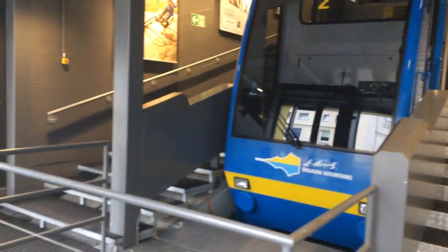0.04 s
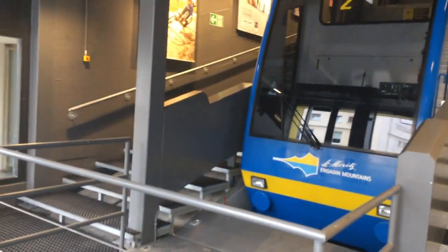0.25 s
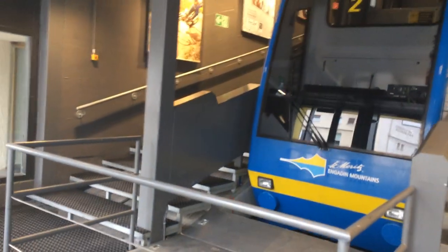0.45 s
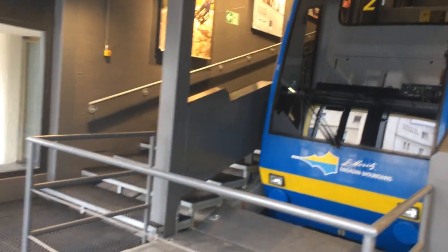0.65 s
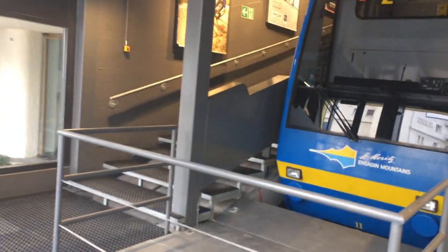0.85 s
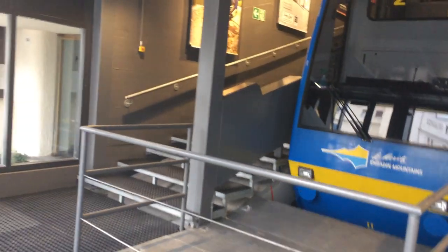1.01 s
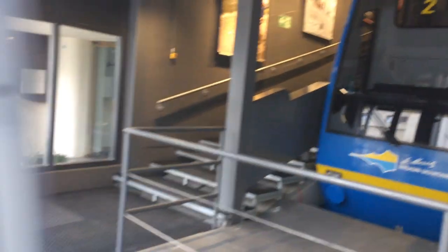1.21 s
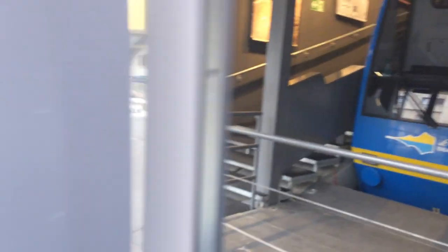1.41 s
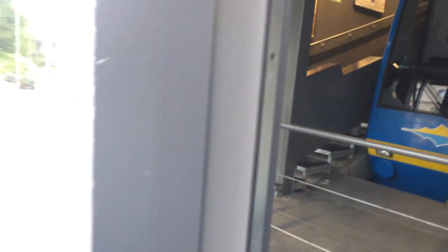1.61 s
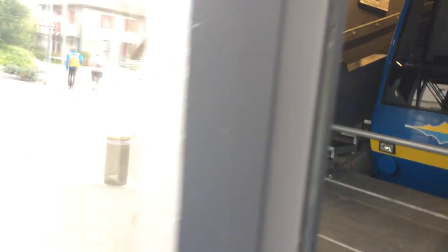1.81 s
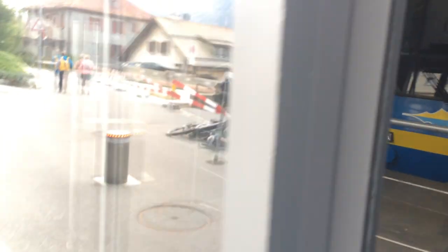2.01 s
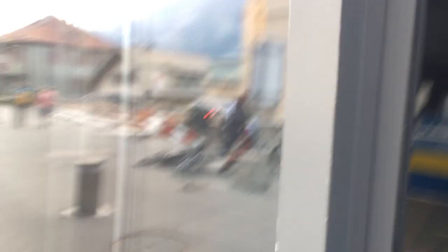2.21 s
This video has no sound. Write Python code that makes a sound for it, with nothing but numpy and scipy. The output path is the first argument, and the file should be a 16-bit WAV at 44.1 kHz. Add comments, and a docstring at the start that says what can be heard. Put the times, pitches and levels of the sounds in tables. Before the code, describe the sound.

A steel door latch snaps at about 0.2 seconds, bright and hard, ringing briefly in a station hall. At about 1.15 seconds the door shuts with a duller clunk, a quick rattle and a short echo. From 1.4 seconds a draught buffets the microphone with low thumps, strongest between 1.7 and 2.1 seconds. A quiet rumble and airy hiss run throughout, with a few faint distant knocks.

```python
"""Latch and door in a funicular station.

Two clacks echo in the hall: a bright steel latch snaps, then a door shuts with a duller clunk.
Each is a few cracking contacts, ringing modes and a diffuse tail. Near the open doorway a draught
buffets the microphone. Behind: faint far knocks, hand rustle and a quiet hall rumble."""
import sys
import numpy as np
from scipy import signal
from scipy.fft import rfft, irfft
from scipy.io import wavfile

SR = 44100
rng = np.random.default_rng(int(sys.argv[2]) if len(sys.argv) > 2 else 0)


def file_out(sig):
    """Save sig as 16-bit WAV at sys.argv[1]."""
    # one column per channel
    cols = np.atleast_2d(sig).T
    # limit, then scale
    lim = np.clip(cols, -1, 1)
    pcm = np.round(lim * 32767).astype(np.int16)
    wavfile.write(sys.argv[1], SR, pcm)


N = 103635
TIME = np.arange(N) / SR

# latch, door contacts: start_s, relative_db
LATCH_CONTACTS = [(0.2162, -2.5), (0.2178, -3), (0.2205, -3.5)]
DOOR_CONTACTS = [(1.149, -13), (1.1528, 1), (1.1548, 3), (1.163, -2), (1.179, -1), (1.208, -13)]
# resonances: pitch_hz, relative_db, t60_s
LATCH_MODES = [(939, -12, .6), (1709, -6, .4), (1908, -4, .35), (1966, -3, .45), (2022, -5, .45),
               (2200, -7, .5), (2457, 1, .35), (2850, -10, .55), (3230, -10, .35), (3395, -8, .35),
               (3668, -7, .3), (3951, -7, .3), (4198, 0, .25), (4275, 0, .25), (5353, -7, .36),
               (5550, -9, .6), (5927, -7, .35), (7052, -6, .3), (7410, -5, .3), (8524, -4, .3)]
DOOR_MODES = [(250, -7, .36), (309, -6, .28), (388, 2, .36), (500, -5, .27), (641, -5, .38), (675, -9, .36),
              (872, -9, .27), (1022, -11, .27), (1711, -1, .24), (1775, -8, .22), (2465, -10, .2),
              (2540, -7, .2), (2691, -8, .24), (3270, -10, .17), (5122, -15, .27), (5192, -18, .27)]
# contact spectra: freq_hz, density_db
LATCH_CRACK_COLOUR = [(500, -27), (1300, -15), (1900, 2.5), (2500, -4.5), (3100, -5.5), (4200, 1.5),
                      (6000, -2), (8000, -7.5), (15000, -8)]
DOOR_CRACK_COLOUR = [(150, -11), (350, 6.5), (700, -19), (1200, -5), (1750, 1.5), (2500, -5.5), (3500, -11),
                     (5300, -11.5), (6200, -25), (11000, -25), (15000, -46)]
# echo spectra: freq_hz, density_db
LATCH_ECHO_COLOUR = [(300, 0), (600, -13), (920, -8.5), (1400, -13.5), (1700, -4), (2400, -2), (2650, -3.5),
                     (4300, -5.5), (4800, -3), (5600, -2), (6600, -6), (7800, -6.5), (9200, -3),
                     (12000, -7), (15500, -13.5)]
DOOR_ECHO_COLOUR = [(120, -10), (170, -10), (230, -0.5), (390, -3.5), (540, -8.5), (650, -10),
                    (1270, -16.5), (1760, -16), (2200, -16), (2600, -21.5), (3600, -25), (5200, -20.5),
                    (5750, -29.5), (11500, -34), (15500, -54)]
# echo decay: freq_hz, t60_s
LATCH_ECHO_T60 = [(400, 0.47), (2000, 0.76), (5000, 0.72), (8000, 0.48), (14000, 0.3)]
DOOR_ECHO_T60 = [(250, 0.35), (1000, 0.47), (2200, 0.36), (5000, 0.52), (12000, 0.25)]

# eddies on the microphone: peak_s, push_db, centre_hz, edge_db
EDDIES = [(0.04, -42, 83, -75), (0.385, -47, 111, -74), (0.699, -44.5, 113, -68), (1.398, -23, 81.6, -59),
          (1.475, -37.5, 144, -52), (1.520, -26.5, 89, -60), (1.635, -25.5, 182, -28),
          (1.642, -23.5, 159, -38), (1.709, -19.5, 97, -34.5), (1.718, -47, 151, -23.5),
          (1.742, -25, 116, -26.5), (1.767, -26, 162, -32), (1.793, -27.5, 180, -54), (1.844, -21, 99, -40),
          (1.882, -24.5, 124, -29.5), (1.906, -35, 150, -30), (1.9282, -21, 159, -22),
          (1.957, -22.5, 123, -38), (2.058, -17.5, 80.6, -39), (2.141, -31.5, 134, -45)]
# draught strength: time_s, level_db
DRAUGHT_LEVEL = [(1.3, -63), (1.42, -46.5), (1.54, -46), (1.6, -50), (1.68, -47), (1.745, -31.5),
                 (1.80, -32.5), (1.87, -40.5), (1.95, -37), (1.99, -42.5), (2.08, -39.5), (2.18, -49),
                 (2.3, -52), (2.35, -46)]
# turbulence spectra: freq_hz, density_db
DRAUGHT_COLOUR = [(20, -27), (45, -6.5), (85, -7), (190, -14), (280, -27), (600, -63), (1500, -73)]
FLUTTER_COLOUR = [(100, -17), (280, -5.5), (500, -7.5), (700, -25), (1000, -25.5), (2000, -73)]

# far knocks: start_s, clatter_db, thud_db
KNOCKS = [(0.031, -61.5, -50), (0.673, -52.5, -64), (0.918, -56.5, -54.5), (1.403, -70, -66)]
# knock spectra: freq_hz, density_db
CLATTER_COLOUR = [(100, -7), (400, 2), (1200, 2.5), (2200, 3.5), (4000, -12), (12000, -28)]
THUD_COLOUR = [(150, -8), (290, -4), (380, -2), (480, -13), (800, -27), (3000, -54)]
# hand rustles: peak_s, level_db, half_length_s
RUSTLES = [(1.72, -67.5, 0.014), (1.98, -68.5, 0.092)]
# rustle spectrum: freq_hz, density_db
RUSTLE_COLOUR = [(500, 0), (3000, -3), (7000, -1), (10000, -3.5), (15000, -14)]
# hall noise spectra: freq_hz, density_db
RUMBLE_COLOUR = [(20, -21), (45, -0.5), (80, -1.5), (170, 2), (260, -5), (400, -10), (600, -27),
                 (2000, -45)]
AIR_COLOUR = [(260, -12), (450, -2.5), (700, -2), (1130, -5), (1900, -8), (3000, -13), (5200, -17),
              (7000, -18), (11000, -25), (15500, -35)]
# hall noise strength: time_s, level_db
RUMBLE_LEVEL = [(0, -48.5), (.25, -50.5), (.39, -43.5), (.55, -57), (.8, -54.5), (1.1, -53.5), (1.6, -63.5),
                (2.35, -56.5)]
AIR_LEVEL = [(0, -56), (.1, -56), (.2, -54.5), (.6, -57), (.85, -62.5), (1.08, -62.5), (1.45, -58.5),
             (1.7, -62.5), (2.1, -63), (2.25, -55), (2.35, -61)]


def latch():
    """Steel snaps on steel, hard and bright."""
    crack = cracks(LATCH_CONTACTS, LATCH_CRACK_COLOUR, LATCH_MODES, boost_db=7.5, t60_s=.039)
    ring = ringing(LATCH_CONTACTS, LATCH_MODES)
    echo = hall_echo(LATCH_CONTACTS, LATCH_ECHO_COLOUR, LATCH_MODES, LATCH_ECHO_T60,
                     rise_s=.003, hold_s=.004)
    return high_pass(from_db(-19) * crack + from_db(-34.5) * ring + from_db(-25.5) * echo, hz=504)


def door():
    """The door meets its stop and rattles briefly; its panel booms."""
    crack = cracks(DOOR_CONTACTS, DOOR_CRACK_COLOUR, DOOR_MODES, boost_db=4, t60_s=.031)
    ring = ringing(DOOR_CONTACTS, DOOR_MODES)
    echo = hall_echo(DOOR_CONTACTS, DOOR_ECHO_COLOUR, DOOR_MODES, DOOR_ECHO_T60,
                     rise_s=.01, hold_s=.063)
    return high_pass(from_db(-30.5) * crack + from_db(-40) * ring + from_db(-36) * echo, hz=190)


def cracks(contacts, colour, modes, boost_db, t60_s):
    """One noise burst per contact, coloured by the part's modes."""
    return struck(contacts, t60_s) * noise(colour, modes, boost_db)


def ringing(contacts, modes):
    """Every contact excites all modes."""
    out = 0
    for hz, db, t60_s in modes:
        tone = np.real(waver() * np.exp(2j * np.pi * (hz * TIME + rng.random())))
        out += from_db(db) * struck(contacts, t60_s) * tone
    return out


def struck(contacts, t60_s):
    """Envelope of repeated strikes: contact energies add and decay."""
    energy = np.zeros(N)
    for start_s, db in contacts:
        energy[int(start_s * SR)] += from_db(db) ** 2
    retained = from_db(-60 / (t60_s * SR)) ** 2
    return np.sqrt(signal.lfilter([1], [1, -retained], energy + 1e-18))


def waver(corner_hz=20, step_hz=60):
    """Reflections add to the direct sound: level and phase drift. Complex gain, rms about 1."""
    steps_s = np.arange(int(N / SR * step_hz) + 2) / step_hz
    pole = np.exp(-2 * np.pi * corner_hz / step_hz)
    white = rng.standard_normal((2, len(steps_s)))
    real, imag = signal.lfilter([np.sqrt((1 - pole ** 2) / 2)], [1, -pole], white)
    return (1 + np.interp(TIME, steps_s, real + 1j * imag)) / np.sqrt(2)


def hall_echo(contacts, colour, modes, t60_table, rise_s, hold_s):
    """Diffuse tail: holds during early reflections, then each octave decays at its own rate."""
    start_s = contacts[0][0]
    spectrum = rfft(noise(colour, modes, boost_db=2.5))
    octave = np.log2(np.clip(np.fft.rfftfreq(N, 1 / SR), 125, 16000) / 125)
    out = 0
    for k in range(8):
        band = irfft(spectrum * np.maximum(1 - abs(octave - k), 0), N)
        out += band * envelope(start_s, rise_s, hold_s, at_hz(t60_table, 125 * 2 ** k))
    return out


def eddies(damping=1.32, edge_hz=371, edge_half_s=.0011):
    """Each eddy is a soft push of air on the microphone; fiercer ones pop with a sharp edge."""
    out = 0
    for peak_s, push_db, centre_hz, edge_db in EDDIES:
        age_s = TIME - peak_s
        cusp = np.exp(.5 - 2 * np.hypot(damping * age_s * centre_hz, .25))  # rounded, peak 1
        push = cusp * np.cos(2 * np.pi * age_s * centre_hz + rng.normal(0, .44))
        pop_hz = edge_hz * np.exp(rng.normal(0, .1))
        window = np.exp(-(age_s / edge_half_s) ** 2)
        edge = window * np.cos(2 * np.pi * age_s * pop_hz + rng.normal(0, .6))
        out += from_db(push_db) * push + from_db(edge_db) * edge
    return out


def draught(strong_flow_db=-32, strong_flutter_db=-45, flutter_db_per_db=1.42):
    """Low turbulence on the microphone; a higher flutter grows faster as the flow rises."""
    flow_db = in_time(DRAUGHT_LEVEL)
    flutter_db = strong_flutter_db + flutter_db_per_db * (flow_db - strong_flow_db)
    flutter = from_db(flutter_db) * noise(FLUTTER_COLOUR)
    return from_db(flow_db) * noise(DRAUGHT_COLOUR) + flutter


def far_knocks(rise_s=.0049, t60_s=.3):
    """Distant knocks: clatter plus thud, blurred by the hall."""
    clatter, thud = noise(CLATTER_COLOUR), noise(THUD_COLOUR)
    out = 0
    for start_s, clatter_db, thud_db in KNOCKS:
        knock = from_db(clatter_db) * clatter + from_db(thud_db) * thud
        out += knock * envelope(start_s, rise_s, hold_s=rise_s, t60_s=t60_s)
    return out


def hand_rustles():
    """Soft, high brushing of the hand holding the microphone."""
    swells = sum(from_db(db) * np.exp(-((TIME - peak_s) / half_s) ** 2) for peak_s, db, half_s in RUSTLES)
    return swells * noise(RUSTLE_COLOUR)


def hall_noise():
    """Low rumble and airy wash of station and street."""
    rumble = from_db(in_time(RUMBLE_LEVEL)) * noise(RUMBLE_COLOUR)
    air = from_db(in_time(AIR_LEVEL)) * unit_rms(high_pass(noise(AIR_COLOUR), hz=390))
    return rumble + air


def noise(colour, modes=(), boost_db=0, q=51):
    """Steady coloured noise, boosted around each mode; rms 1."""
    freq_hz = np.fft.rfftfreq(N, 1 / SR)
    peaks = sum(1 / (1 + (q * (freq_hz / hz - 1)) ** 2) ** 2 for hz, _, _ in modes)
    gain = from_db(at_hz(colour, freq_hz) + boost_db * np.minimum(peaks, 1))
    return unit_rms(irfft(rfft(rng.standard_normal(N)) * gain, N))


def envelope(start_s, rise_s, hold_s, t60_s):
    """Linear rise; exponential decay from hold_s after the start."""
    age_s = TIME - start_s
    return np.clip(age_s / rise_s, 0, 1) * from_db(-60 * np.maximum(age_s - hold_s, 0) / t60_s)


def from_db(db):
    """Decibels to gain."""
    return 10 ** (np.asarray(db) / 20)


def unit_rms(x):
    """Scale to rms 1."""
    return x / np.sqrt(np.mean(x ** 2) + 1e-20)


def in_time(table):
    """Table value at every sample."""
    return np.interp(TIME, *np.transpose(table))


def at_hz(table, hz):
    """Table value on a log-frequency axis."""
    freq_hz, value = np.transpose(table)
    return np.interp(np.log(hz + 1e-3), np.log(freq_hz), value)


def high_pass(x, hz):
    """Second-order bass cut."""
    return signal.sosfilt(signal.butter(2, hz, "high", fs=SR, output="sos"), x)


def scene():
    """All sources, mono."""
    return (latch() + door() + eddies() + draught() + far_knocks() + hand_rustles() + hall_noise())[None]


def record(dry):
    """Band limit: gentle deep-bass cut, steep top cut."""
    low_hz, top_hz = 36.2, 15900
    low_pass = signal.ellip(10, .2, 80, top_hz, fs=SR, output="sos")
    return signal.sosfilt(low_pass, high_pass(dry, low_hz))


dry = scene()
out = record(dry)
file_out(out)
```